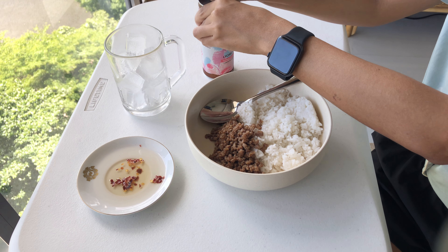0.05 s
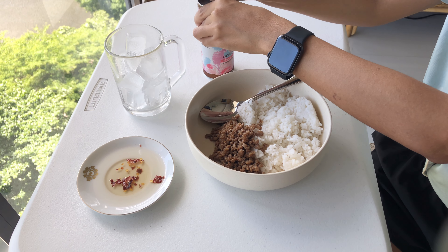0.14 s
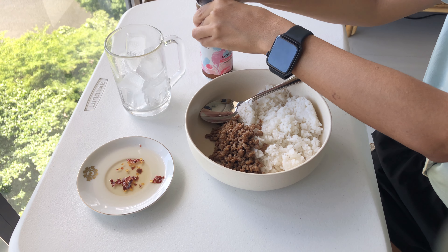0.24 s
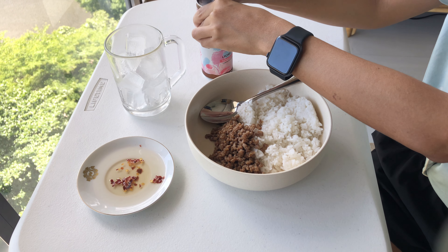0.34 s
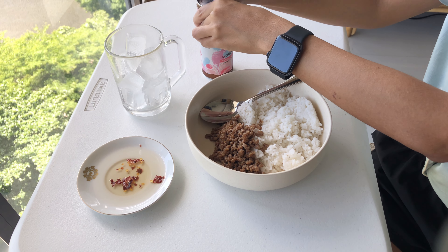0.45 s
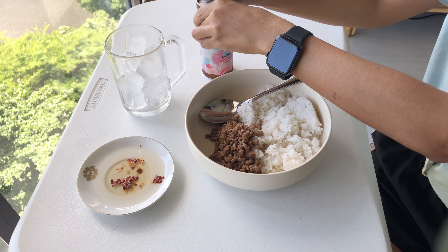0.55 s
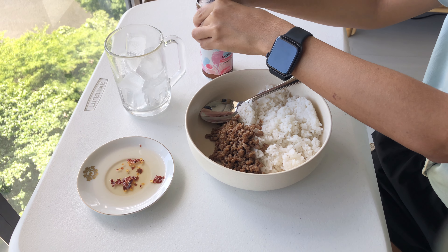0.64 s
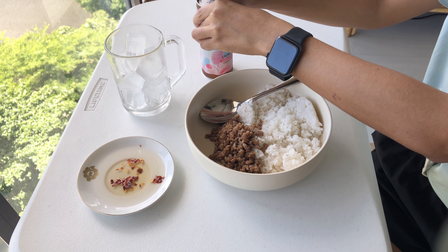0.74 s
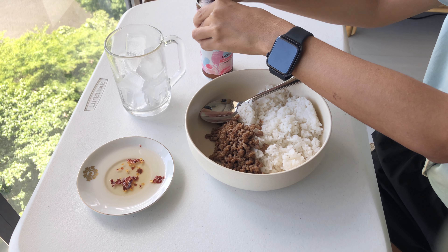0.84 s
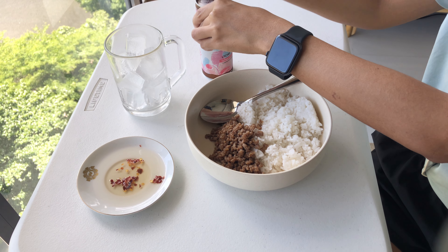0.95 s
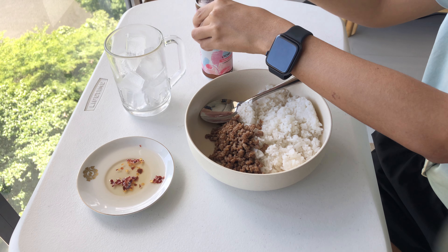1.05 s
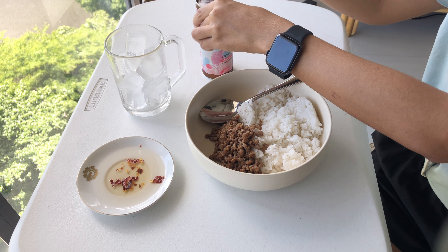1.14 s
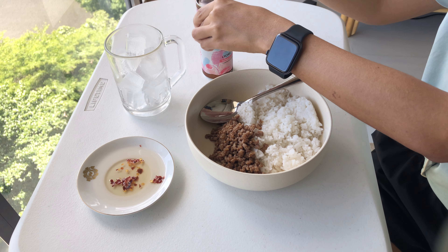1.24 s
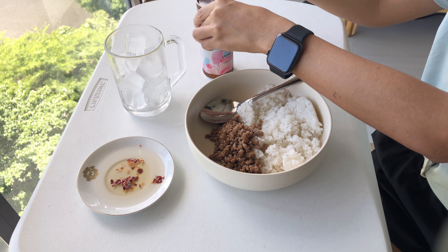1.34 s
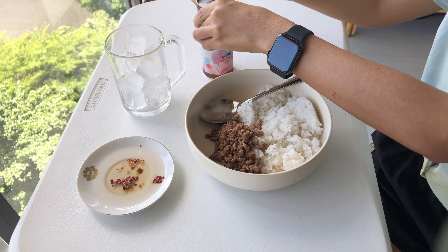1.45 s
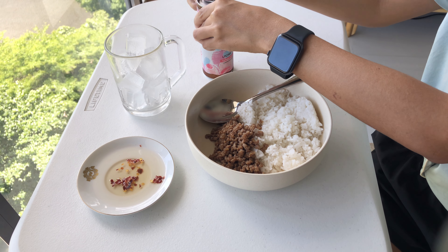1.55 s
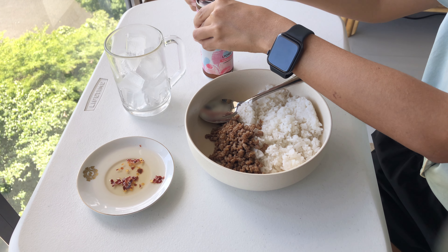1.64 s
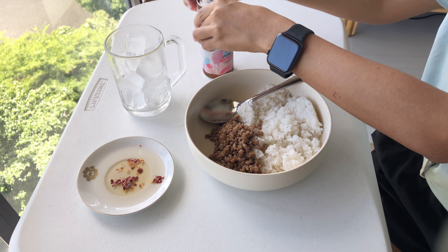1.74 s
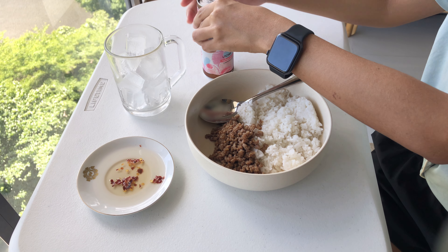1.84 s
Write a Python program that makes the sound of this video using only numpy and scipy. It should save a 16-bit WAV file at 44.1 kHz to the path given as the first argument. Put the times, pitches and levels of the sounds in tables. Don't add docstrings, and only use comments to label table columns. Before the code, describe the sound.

A drink can is cracked open close to a mono phone microphone in a bare, quiet room with low cooler hum. The echo of an earlier tear fades at first; light nail taps and metal ticks lead to a very loud, brief crack at 0.21 s, its bright echo dying over half a second. Faint tab clicks at 0.85, ice snap at 1.06, tab flick at 1.31, tiny pops until 1.58.

```python
import sys
import numpy as np
from scipy import signal
from scipy.fft import rfft, irfft
from scipy.io import wavfile

SR = 44100
rng = np.random.default_rng(int(sys.argv[2]) if len(sys.argv) > 2 else 0)


def generate_wav(signal):
    frames = np.transpose(np.atleast_2d(signal))
    scaled = np.clip(frames, -1, 1) * 32767
    pcm = np.round(scaled).astype(np.int16)
    wavfile.write(sys.argv[1], SR, pcm)


def ratio(d):
    e = np.asarray(d, float) / 20
    return 10 ** e


N = 83790
LEAD = SR // 4
SPAN = 4096

# pitch_hz, density_db (per Hz)
AIR_SPECTRUM = [(25, -43), (45, -22), (60, -16), (165, -12), (216, -27), (400, -26), (800, -36),
                (15700, -54)]
# pitch_hz, width_hz, level_db
COOLER_LINES = [(57, 10, -63), (88, 20, -66), (119, 10, -56), (150, 25, -62), (173, 16, -56),
                (380, 60, -71)]
# time_s, level_db
COOLER_LOAD = [(0, 6), (.45, 5), (.8, -1), (1.9, 1)]
# pitch_hz, t60_s
ROOM_T60 = [(300, .5), (1000, .56), (2500, .56), (5000, .56), (8000, .48), (12000, .4), (16000, .32)]
# pitch_hz, level_db
ROOM_COLOUR = [(300, -1), (800, 0), (1600, -2), (3000, -1), (5000, 2), (8000, 3), (12000, 3), (16000, 3)]
# pitch_hz, width_hz, level_db
EARLIER_COLOUR = [(1700, 1200, -3), (3200, 1500, -4), (4300, 2000, -1), (6500, 3000, 0), (9500, 4000, 1),
                  (13500, 5000, 1)]
# start_s, level_db, burst_s
NAIL_TAPS = [
    (.064, -38, .002),
    (.1435, -35, .002),
]
# pitch_hz, width_hz, level_db
NAIL_MODES = [(3000, 700, 0), (3900, 600, 0)]
# start_s, level_db, burst_s
SCORE_TICKS = [
    (.0755, -36, .004),
    (.0984, -12, .0036),
    (.1313, -28, .003),
    (.158, -33, .004),
    (.202, -35, .004),
    (.105, -32, .008),
    (.183, -40, .006),
]
# pitch_hz, width_hz, level_db
CLOSED_LID_MODES = [(1900, 900, -17), (3820, 800, -8), (5600, 800, -7), (7190, 800, 0), (8660, 800, -2),
                    (10200, 1000, -2), (12200, 900, -2), (14000, 1500, -8)]
# start_s, level_db, burst_s
LID_TEARS = [
    (.2087, -8.5, .003),
    (.2177, -2, .0022),
    (.2192, 2.5, .0032),
    (.2212, -4, .002),
]
# pitch_hz, width_hz, level_db
TORN_LID_MODES = [(1750, 700, -3), (2300, 800, -7), (3920, 700, -2), (4550, 800, 1), (5300, 800, -3),
                  (5950, 700, 1), (6500, 700, -1), (7500, 1100, -2), (8660, 900, -4), (9750, 700, 0),
                  (10400, 900, -2), (12300, 1500, -2), (14000, 2500, -7)]
# start_s, level_db, burst_s
GAS_BURSTS = [
    (.2203, -9, .0015),
]
# pitch_hz, width_hz, level_db
CAN_MODES = [(400, 200, -9), (790, 300, 2), (1750, 600, 1), (2300, 700, -7), (3400, 800, -5),
             (4500, 1400, 1), (6000, 1500, -2)]
# start_s, level_db, burst_s
TAB_BENDS = [
    (.8357, -37, .002),
    (.8636, -36, .002),
    (.8757, -30, .002),
    (.885, -42, .002),
]
# pitch_hz, width_hz, level_db
TAB_MODES = [(1080, 80, 7), (1190, 100, 11), (1550, 400, -6), (2150, 500, -3), (2800, 700, -6),
             (3360, 500, -4), (4100, 600, -8), (5800, 1200, -10), (7050, 700, -11), (8910, 600, -13),
             (9920, 600, -14), (12000, 1200, -20), (14400, 1500, -19)]
# start_s, level_db, burst_s
FOAM_BURSTS = [
    (1.0095, -50, .002),
    (1.3355, -46, .002),
]
# pitch_hz, width_hz, level_db
FOAM_MODES = [(10200, 1200, 0), (13000, 2500, -2)]
# start_s, level_db, burst_s
ICE_SNAPS = [
    (1.0555, -21, .0013),
    (1.0568, -31, .012),
]
# pitch_hz, width_hz, level_db
ICE_MODES = [(800, 300, -11), (1400, 500, -9), (2000, 800, -7), (3000, 1200, 2), (4100, 1500, 0),
             (6000, 1800, -4), (9500, 3500, -9), (13500, 5000, -11)]
# start_s, level_db, burst_s
MOUTH_POPS = [
    (1.274, -45, .003),
    (1.3925, -44, .006),
    (1.5813, -51, .003),
]
# pitch_hz, width_hz, level_db
MOUTH_MODES = [(1280, 250, 0), (1420, 200, -3)]
# start_s, level_db, burst_s
TAB_FLICKS = [
    (1.3073, -22.5, .0033),
    (1.5813, -44, .002),
    (1.316, -34, .003),
    (1.322, -34, .003),
]
# pitch_hz, width_hz, level_db
FLICK_MODES = [(1320, 300, -8), (2150, 500, -10), (2680, 300, -9), (3220, 350, -3), (3960, 500, 3),
               (4400, 400, -2), (4900, 500, -7), (5500, 500, -11), (7240, 600, -8), (7900, 700, -8),
               (9080, 1000, -8), (11500, 3000, -20)]


def ring(x, hz, width):
    return signal.lfilter(*signal.iirpeak(hz, hz / width, fs=SR), x)


def table(rows, hz):
    at, value = np.array(rows, float).T
    return np.interp(np.log(np.maximum(hz, 1)), np.log(at), value)


def body(modes, open_db):
    hz = np.fft.rfftfreq(SPAN, 1 / SR)
    power = ratio(open_db) ** 2 * hz ** 4 / (1000 ** 4 + hz ** 4) + 1e-9
    for f, width, db in modes:
        resonance = (hz * width) ** 2 / ((f ** 2 - hz ** 2) ** 2 + (hz * width) ** 2)
        power = power + ratio(db) ** 2 * resonance ** 2
    cepstrum = irfft(np.log(power) / 2, SPAN)
    cepstrum[1:SPAN // 2] *= 2
    return np.exp(rfft(cepstrum[:SPAN // 2 + 1], SPAN))


def clicks(events, modes, open_db=-20, wet_db=0):
    attack_s = .00015
    out = np.zeros((2, N + LEAD + SPAN))
    t = np.arange(SPAN) / SR
    colour = body(modes, open_db)
    paths = np.array([[1], [ratio(wet_db)]])
    for start_s, level_db, burst_s in events:
        push = rng.standard_normal(SPAN)
        shape = np.exp(-(t / burst_s) ** 2) * np.minimum(t / attack_s, 1)
        for _ in range(2):
            phase = np.angle(rfft(push * shape))
            push = irfft(np.exp(1j * phase), SPAN)
        y = irfft(rfft(push * shape) * colour, SPAN)
        i = int(start_s * SR) + LEAD
        out[:, i:i + SPAN] += y * ratio(level_db) / np.abs(y).max() * paths
    return out[:, :N + LEAD]


def room_noise():
    hz = np.fft.rfftfreq(N, 1 / SR)
    air = rfft(rng.standard_normal(N)) * ratio(table(AIR_SPECTRUM, hz))
    high = irfft(air * (hz > 220), N)
    return irfft(air, N) * ratio(-63) / high.std()


def cooler_hum():
    hum = 0
    for f, width, db in COOLER_LINES:
        line = ring(rng.standard_normal(N + LEAD), f, width)
        line = ring(line, f, width)[LEAD:]
        hum = hum + ratio(db) * line / line.std()
    load_db = np.interp(np.arange(N) / SR, *np.array(COOLER_LOAD, float).T)
    return hum * ratio(load_db)


def room():
    table_s, table_db, build_s = .002, -4.5, .012
    wall_s, wall_db, wall_fade_s = .013, 4, .005
    t, h = np.arange(SR) / SR, 0
    for hz in 200 * 2 ** np.arange(0, 6.5, 1 / 3):
        fade = ratio(table(ROOM_COLOUR, hz) - 60 * t / table(ROOM_T60, hz))
        h = h + fade * ring(rng.standard_normal(SR), hz, hz / 3) / np.sqrt(hz)
    rise = ratio(table_db) + (1 - ratio(table_db)) * np.minimum(t / build_s, 1) ** 2
    wall_fade = np.exp(-np.abs(t - wall_s) / wall_fade_s)
    wall = 1 + (t > wall_s) * (ratio(wall_db) - 1) * wall_fade
    h = h * rise * wall * (t > table_s)
    return h / np.sqrt(np.sum(h ** 2))


def earlier_tear():
    return clicks([(-.08, -8, .003)], EARLIER_COLOUR)[1]


def nail():
    return clicks(NAIL_TAPS, NAIL_MODES, open_db=-26, wet_db=-3)


def score_ticks():
    return clicks(SCORE_TICKS, CLOSED_LID_MODES, open_db=-15, wet_db=-6)


def lid_tears():
    return clicks(LID_TEARS, TORN_LID_MODES, open_db=-12, wet_db=1.5)


def gas_burst():
    return clicks(GAS_BURSTS, CAN_MODES, wet_db=8)


def tab_bends():
    return clicks(TAB_BENDS, TAB_MODES, open_db=-26, wet_db=-1.5)


def foam():
    return clicks(FOAM_BURSTS, FOAM_MODES, open_db=-30, wet_db=-4)


def ice_snaps():
    return clicks(ICE_SNAPS, ICE_MODES, open_db=-14, wet_db=4)


def mouth_pops():
    return clicks(MOUTH_POPS, MOUTH_MODES, open_db=-40, wet_db=-7)


def tab_flicks():
    return clicks(TAB_FLICKS, FLICK_MODES, open_db=-30, wet_db=-3)


def scene():
    lid, lid_send = score_ticks() + lid_tears()
    wall, wall_send = gas_burst()
    rest, rest_send = nail() + tab_bends() + ice_snaps() + tab_flicks() + mouth_pops() + foam()
    echo = signal.fftconvolve(lid_send + rest_send + earlier_tear(), room())
    quiet = room_noise() + cooler_hum()
    wall_echo = signal.fftconvolve(wall_send, room())
    events = lid + wall + rest + (echo + wall_echo)[:N + LEAD]
    mono = events[LEAD:] + quiet
    return np.array([mono, mono])


def roll_off(x):
    return signal.sosfilt(signal.butter(12, 15850, fs=SR, output="sos"), x)


def record(dry):
    top_hz = 15800
    low_pass = signal.ellip(8, .2, 60, top_hz, fs=SR, output="sos")
    x = signal.sosfilt(low_pass, dry)
    return roll_off(np.clip(x, -1, 1))


dry = scene()
out = record(dry)
generate_wav(out)
```